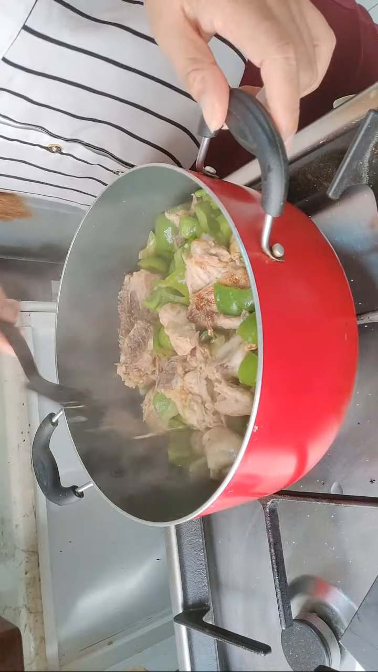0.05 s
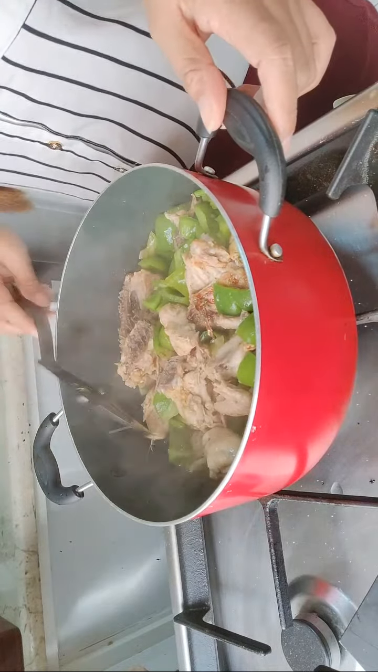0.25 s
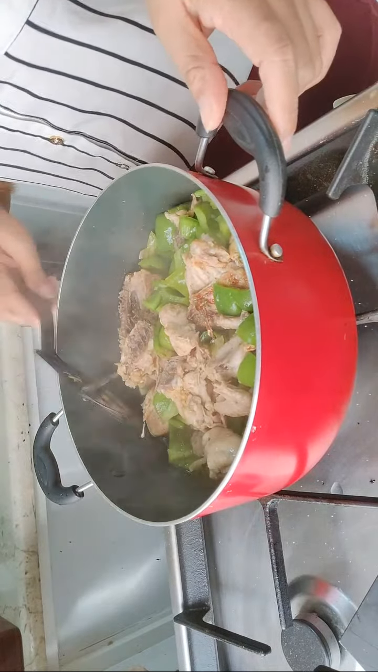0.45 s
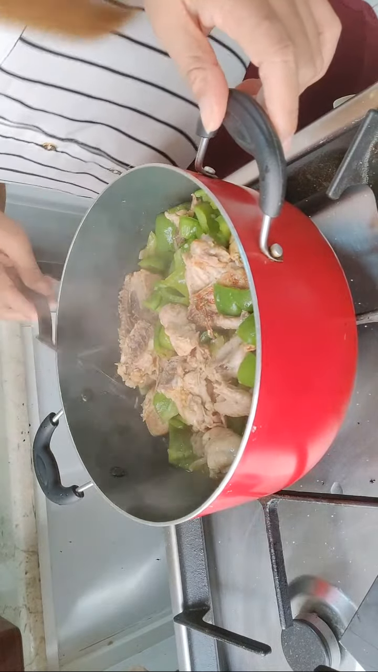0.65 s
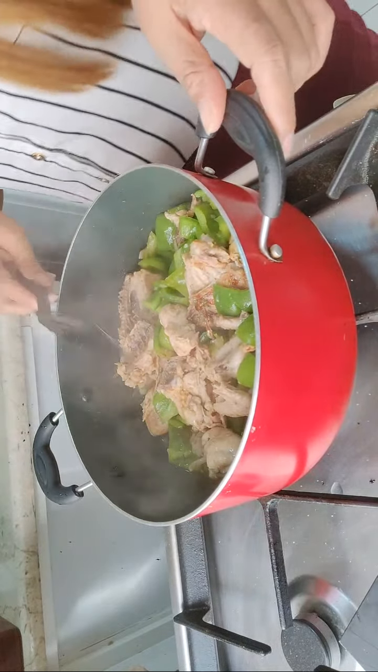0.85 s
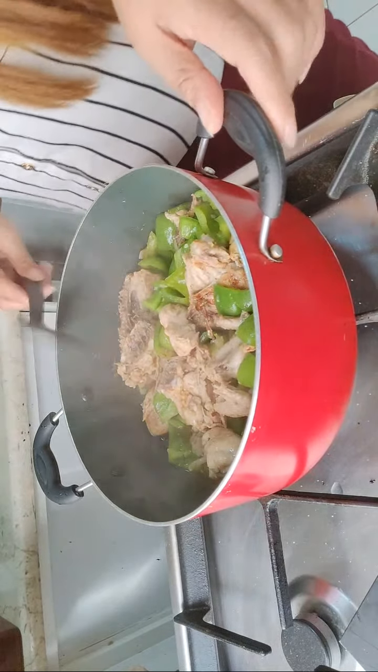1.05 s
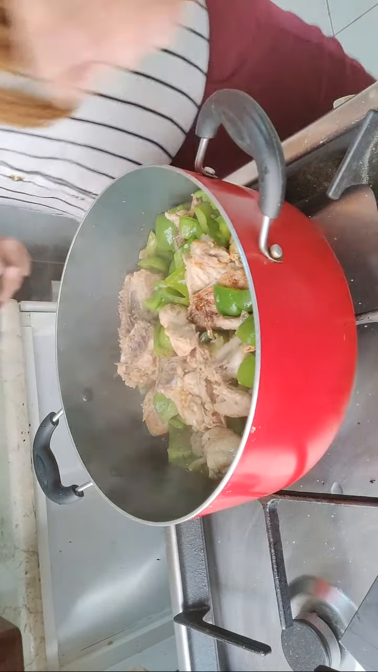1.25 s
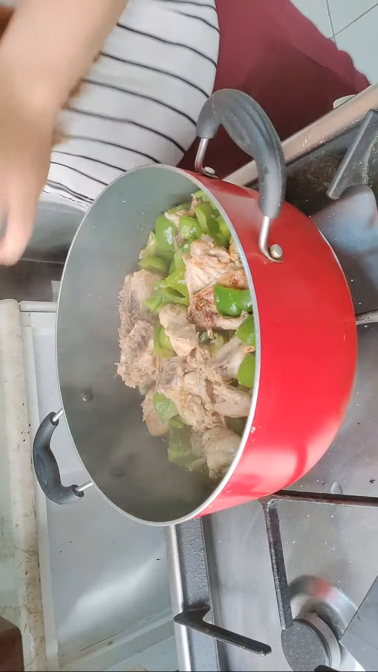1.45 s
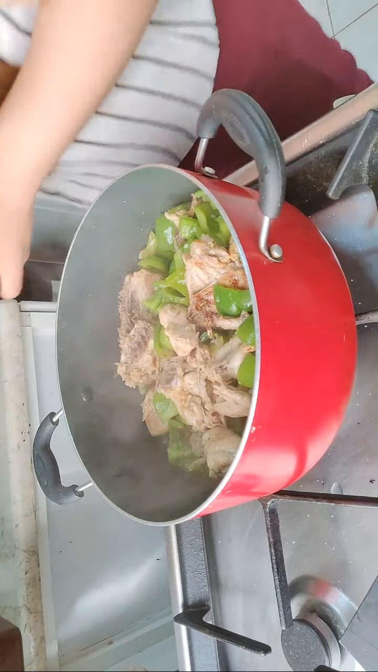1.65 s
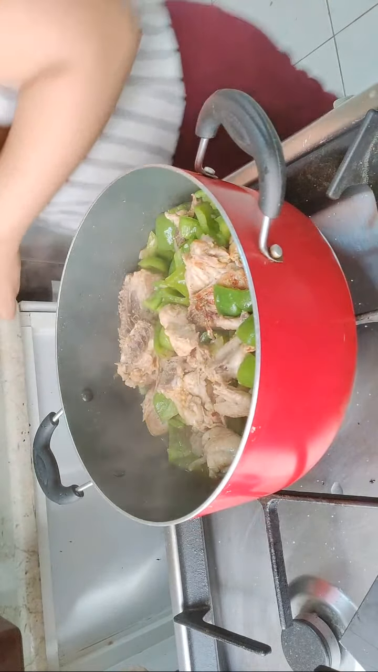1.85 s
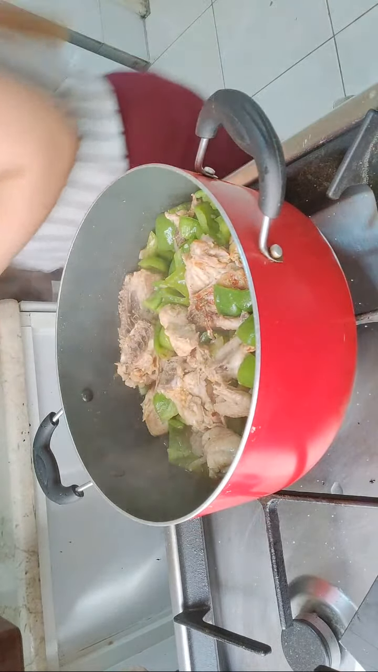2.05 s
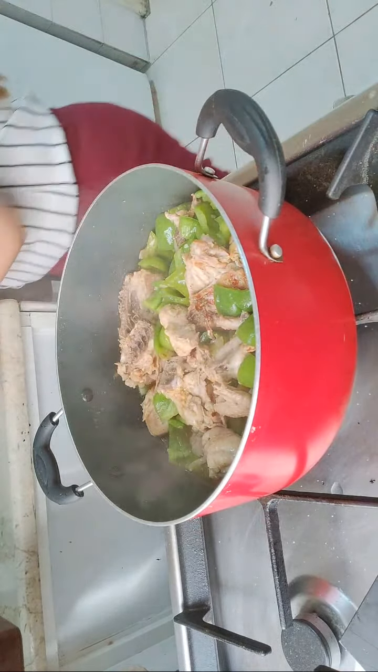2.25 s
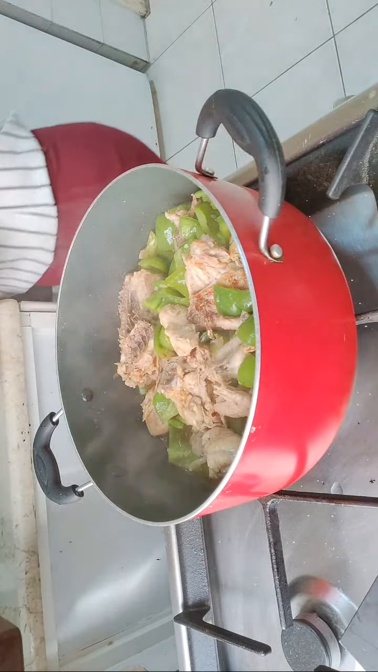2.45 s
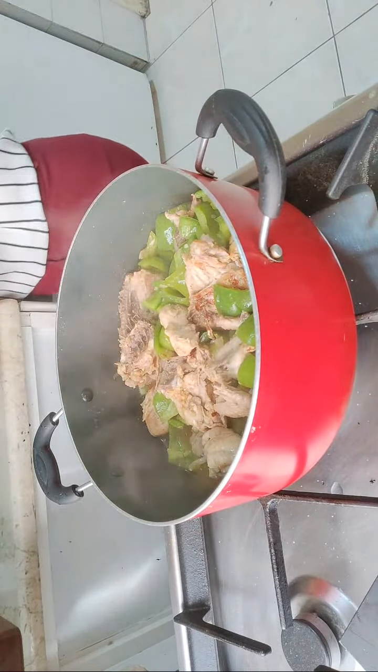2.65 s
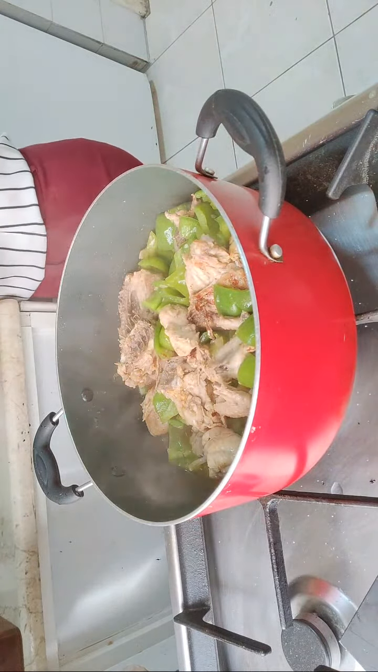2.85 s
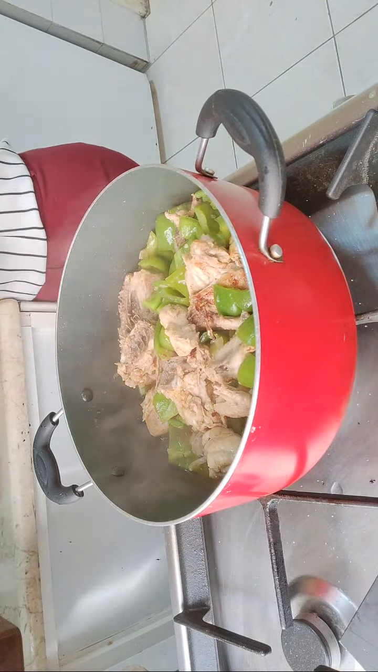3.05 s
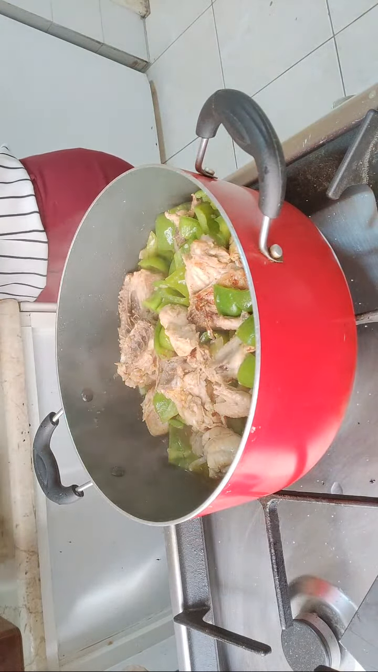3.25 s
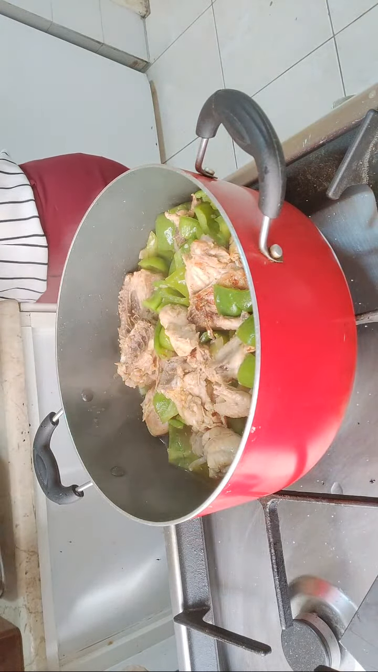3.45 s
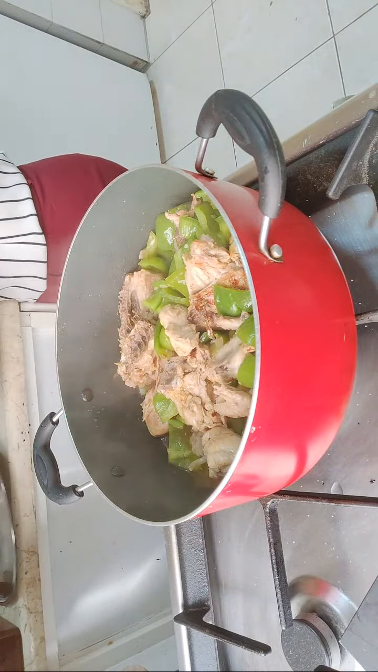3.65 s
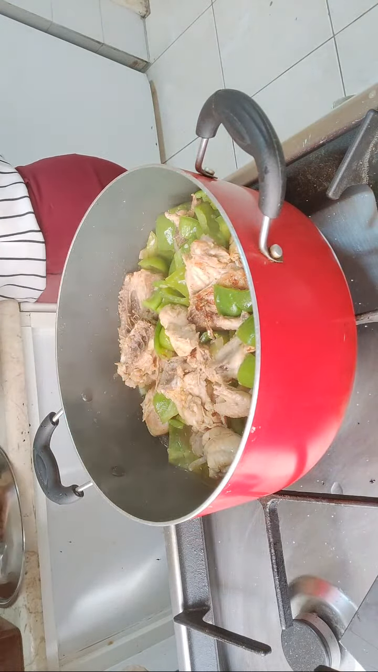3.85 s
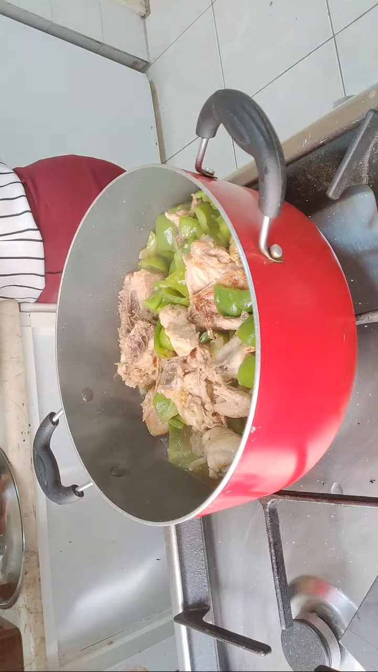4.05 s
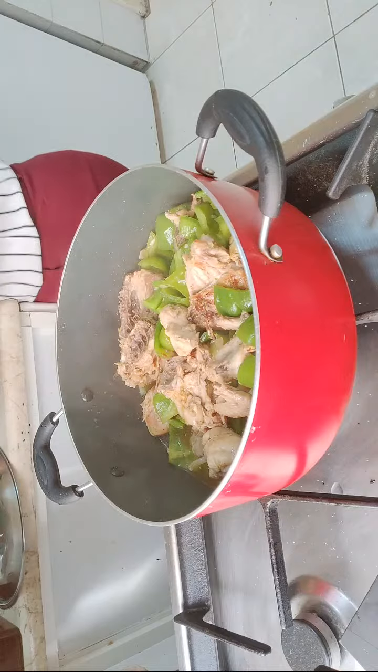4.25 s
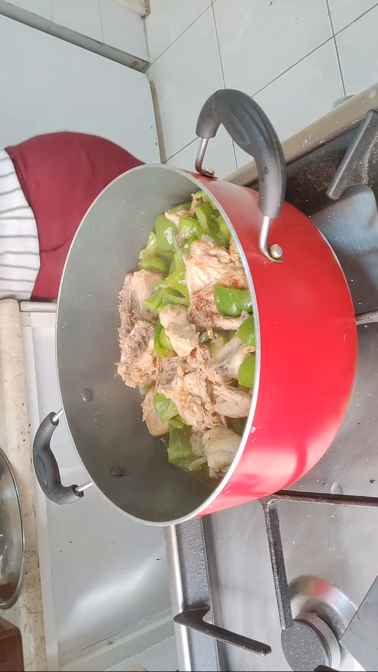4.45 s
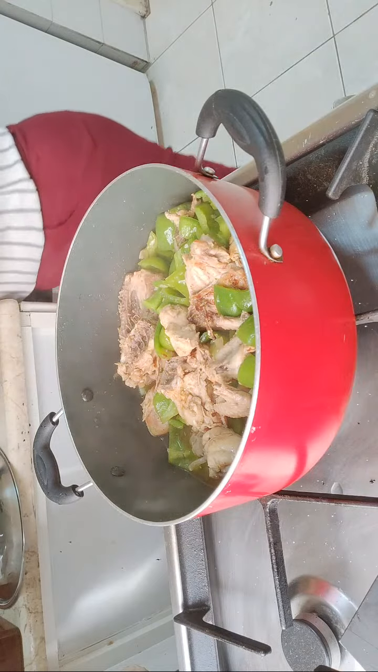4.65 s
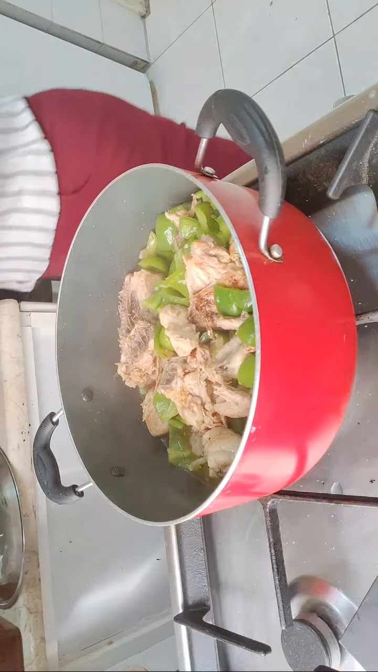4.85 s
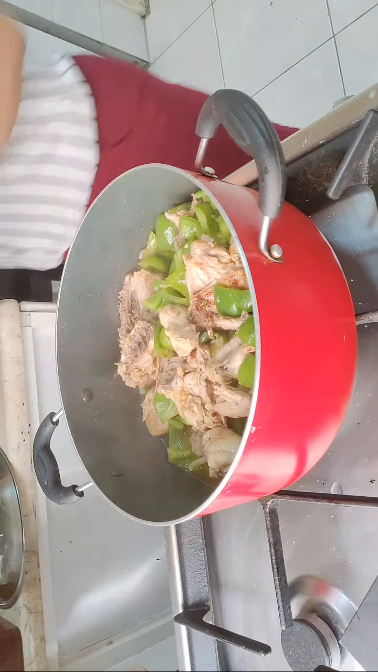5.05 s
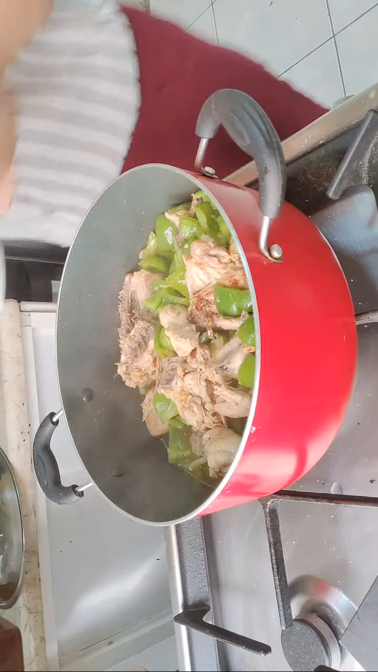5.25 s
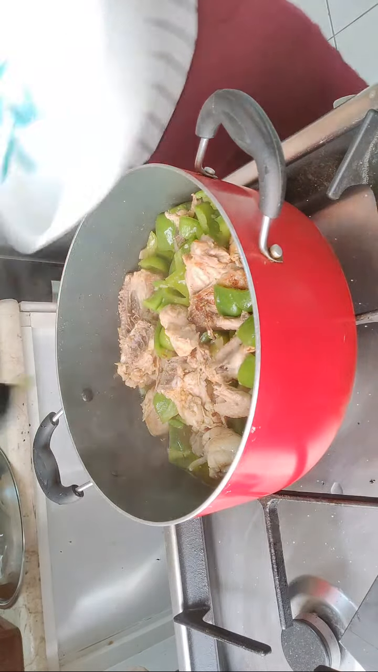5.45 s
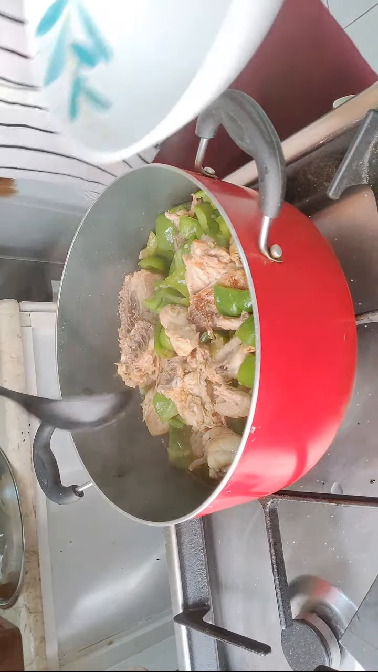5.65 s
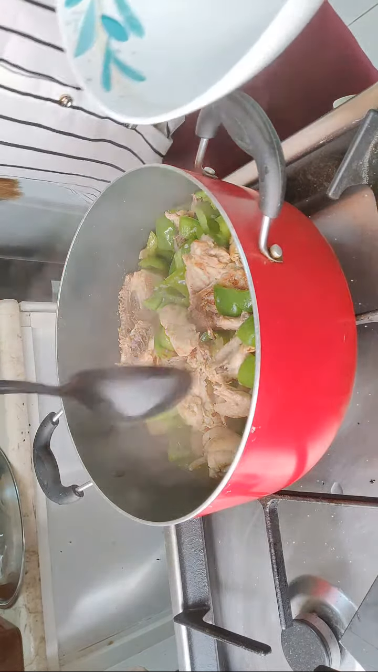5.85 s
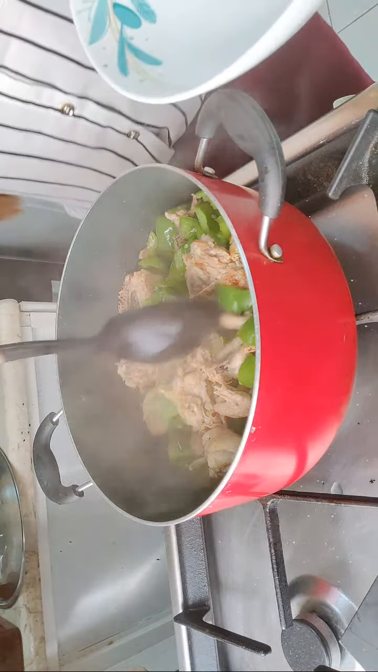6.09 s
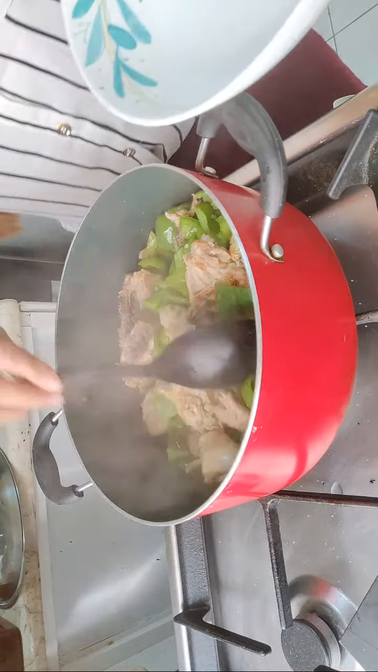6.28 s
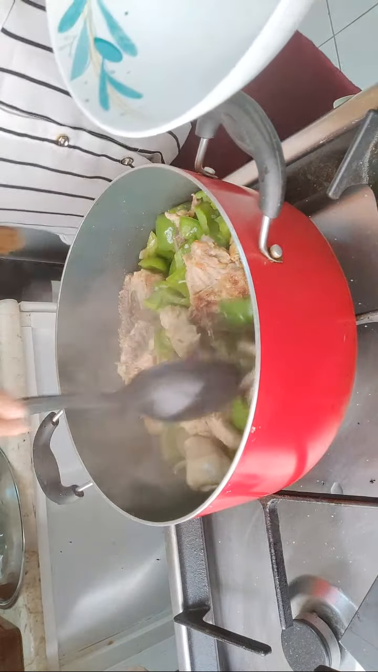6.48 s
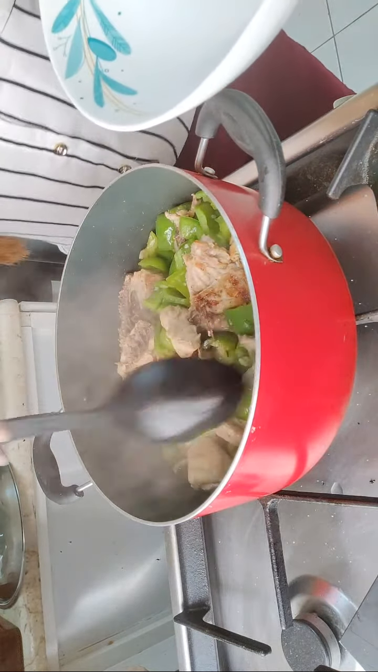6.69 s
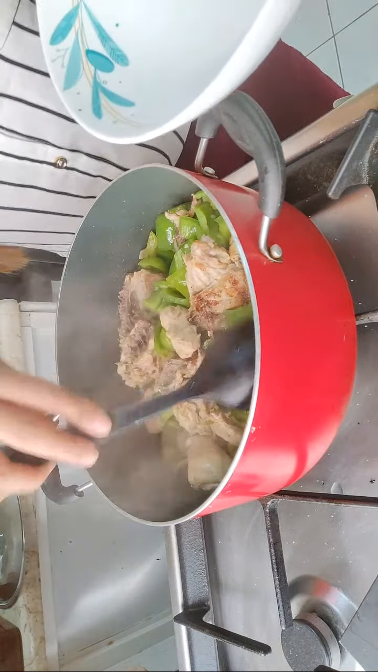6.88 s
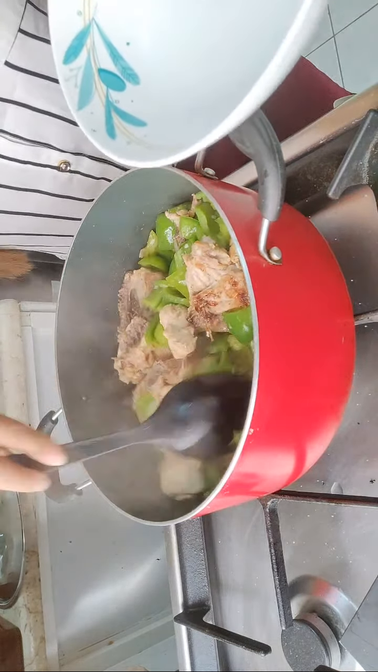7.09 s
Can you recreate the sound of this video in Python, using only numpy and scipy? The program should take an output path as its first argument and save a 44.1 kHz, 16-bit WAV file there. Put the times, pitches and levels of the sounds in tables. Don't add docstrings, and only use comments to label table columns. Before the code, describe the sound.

Five evenly spaced hard metallic cracks come from a pot rim near the microphone, with short rings and low thuds as the pot rocks on the stove. Small cutlery clinks follow at a distance, leading to a rapid, echoing steel clatter, the loudest moment. Quiet returns, then dull ladle knocks and light ticks sound on the pot. Underneath are soft spitting food, moving air and a steady low hum in a reflective kitchen.

```python
import sys
import numpy as np
from scipy import signal
from scipy.fft import rfft, irfft, next_fast_len
from scipy.io import wavfile

SR = 44100
rng = np.random.default_rng(int(sys.argv[2]) if len(sys.argv) > 2 else 0)


def materialize(psi):
    bounded = np.clip(np.atleast_2d(psi).T, -1, 1)
    quanta = np.round(bounded * 32767).astype(np.int16)
    wavfile.write(sys.argv[1], SR, quanta)


def makeup_ratio(level_db):
    decades = np.asarray(level_db, float) / 20
    return 10 ** decades


N = 314059

# f/Hz, density/dB
DRONE_COLOUR = [(15, -52), (25, -21.5), (64, -10.5), (80, -19), (118, 5), (137, -7.5), (152, -8), (254, -4),
                (404, -18), (500, -13), (650, -33.5), (1100, -120)]
AIR_COLOUR = [(210, -17), (350, 0.5), (548, -8.5), (583, -3), (841, -1), (1040, -3.5), (1200, -4),
              (4000, -13.5), (5200, -37), (8800, -120)]
SIZZLE_COLOUR = [(1760, -47), (3000, -15), (3970, -9), (4630, -4), (5670, -5), (6670, 0.5), (7050, 2.5),
                 (7670, -2.5), (8340, 2.5), (8880, -1.5), (12500, -14.5), (15100, -12.5), (16000, -24.5)]
# f/Hz, width/Hz, level/dB
STANDING_WAVES = [(89.5, 8.7, -73), (128.12, 4.67, -63), (209.3, 26, -67.5)]
# t/s, level over rest/dB
BUSTLE = [(0, -1.5), (.2, 0), (1.0, 5.5), (1.3, 8.5), (1.45, 6.5), (1.7, 0), (1.95, 0.5), (2.25, 2.5),
          (2.85, -0.5), (3.07, 3.5), (3.4, -0.5), (3.62, 0), (3.85, 10.5), (4.3, 2.5), (4.7, -0.5),
          (5.9, 0), (6.2, 0), (7.12, 2.5)]
# t/s, level/dB, length/s
FLARES = [
    (1.325, 6.5, 0.102),
    (1.64, 1.5, 0.2),
    (2.356, 3.5, 0.084),
    (2.745, 3, 0.061),
    (5.395, 2, 0.114),
    (6.327, 1.5, 0.224),
    (6.903, 1, 0.48),
]
# f/Hz, t60/s
KITCHEN_DECAY = [(150, 0.51), (500, 0.441), (1500, 0.516), (4000, 0.578), (8000, 0.444), (14000, 0.413)]

# t/s, peak level/dB, contact/ms, tines over tray/dB
CLINKS = [(2.38, -52, 5.1, 8), (2.47, -48.5, 5.5, 2.5), (2.6725, -36.5, 4.6, 21), (2.746, -32, 3.96, 12),
          (2.78, -54.5, 12, 7.5), (3.000, -32, 1.93, 1.5), (3.035, -41.5, 10, -20),
          (3.08, -48.5, 24.7, -8.5), (3.13, -47.5, 9.9, -7), (3.19, -57.5, 6, 8), (3.554, -44, 6.1, 12),
          (4.23, -44, 3.4, 8.5)]
# f/Hz, density/dB
CLINK_CRACK = [(180, -30), (300, 5.5), (856, -7), (2000, -12), (2210, -21.5), (4090, -8.5), (4750, -10.5),
               (6100, -1), (8360, -2), (16000, -27.5)]
# f/Hz, level/dB, t60/s
TRAY = [(716, -8, 0.03), (905.5, 1, 0.026), (1153, -1, 0.0164), (1393, -2.5, 0.0166)]
HANDLES = [(5690, -14, 0.017), (6007, -8.5, .02), (6850, -8, .02)]
TINES = [(8070, 1, 0.058), (9743, -6, .015)]

# t/s, peak level/dB, lip over bottom/dB
TIPPED = [
    (3.701, -32, -6.5),
    (3.705, -21, 7.5),
    (3.73, -21.5, -14),
    (3.755, -27, -14.5),
    (3.777, -23.5, 6),
    (3.80, -26.5, 4),
]
FALLEN = [
    (3.846, -18, 3.5),
    (3.849, -15, 10),
    (3.861, -9.5, 7.5),
    (3.872, -7.5, -0.5),
    (3.882, -10, 5.5),
    (3.899, -13.5, -12),
    (3.915, -10.5, -7),
    (3.94, -24, 11.5),
    (3.955, -29.5, 7.5),
    (3.99, -18, 7.5),
]
# f/Hz, density/dB
CLATTER_CRACK = [(300, -20), (450, -12.5), (560, -3.5), (850, -12.5), (1250, -10), (2000, -9.5), (3200, -5),
                 (4100, -12.5), (5500, -9), (6400, -8), (8200, -1), (10000, -9.5), (12500, -17),
                 (16400, -18)]
# f/Hz, level/dB, t60/s
BOWL_BOTTOM = [(555, -17.5, 0.029), (1210, -5, 0.03), (1416, -3.5, 0.12), (1757, -4, 0.113),
               (1941.6, -3, 0.033)]
BOWL_SIDE = [(2166, -3.5, 0.056), (2603, -5.5, 0.067), (2660, -2, 0.019), (2896, -8, 0.031),
             (3260, -1.5, 0.144), (3640, -17, 0.045), (5533, -0.5, 0.046)]
BOWL_LIP = [(6755, -6.5, .06), (6826, -3, 0.033), (6978, -5.5, 0.038), (7310, 1.5, 0.058),
            (7460, 3.5, 0.081), (7650, -5, .04), (7900, -6.5, 0.054), (8680, -18, 0.083),
            (8105, 2.5, 0.076), (8350, 2.5, 0.051), (8250, -7.5, 0.058), (9170, -17.5, 0.112),
            (9344, 0, 0.077), (10120, -2, .07), (9646, -6.5, 0.105), (10210, -18, 0.059),
            (11250, -14.5, .05)]

# t/s, peak level/dB, contact/ms, ring/dB
TICKS = [
    (2.085, -52, 60, -28.5),
    (2.13, -65.5, 33, -22),
    (6.236, -51, 5.4, -15.5),
    (6.449, -37.5, 5.7, -18.5),
    (6.47, -54.5, 43, -5.5),
    (6.793, -41.5, 3.4, 3),
    (6.805, -51.5, 40, -15),
]
# f/Hz, density/dB
TICK_CRACK = [(300, -10), (1000, 1), (2000, -1), (4000, 0.5), (8000, 3), (16000, -21)]
# f/Hz, level/dB, t60/s
EDGE_LOW = [(2471, -4, 0.0062), (3030, -9.5, 0.0097)]
EDGE_HIGH = [(4020, 3, 0.0082), (4400, -5, .01), (5277, -4, 0.011)]
# t/s, peak level/dB, contact/ms, sway over wall/dB
BUMPS = [
    (2.284, -43.5, 19.5, -11),
    (6.189, -52.5, 5.1, -1),
    (6.341, -37, 2.23, -11),
    (6.35, -49, 3.5, -3),
    (6.379, -45, 11, -4.5),
    (6.45, -28, 6.3, -1.5),
    (6.48, -31.5, 14, 9.5),
]

# f/Hz, density/dB
POT_THUD = [(59, -44), (100, 5), (165, -2), (253, 7), (458, -9.5), (744, 1), (1440, -16.5), (1880, -47.5),
            (2500, -34), (3250, -59), (5500, -120)]
# f/Hz, level/dB, t60/s
POT_SWAY = [(214.9, 0, 0.1536)]
POT_BASE = [(281, -4.5, 0.0766), (342.65, -0.5, 0.0327), (454.6, -9, 0.0514)]
POT_WALL = [(559.3, -6.5, 0.29), (716, -3.5, 0.037), (763.6, -7, 0.055), (1003, -12.5, 0.047)]
# t/s, peak level/dB
LATE_ROCKS = [
    (0.714, -36),
    (1.141, -34.5),
]

# t/s, peak level/dB, contact/ms, rebound after/ms, rebound loss/dB
RAPS = [
    (0.2405, -19.5, 3.94, 21.5, 8.5),
    (0.469, -17, 2.99, 18, 20),
    (.677, -17.5, 2.98, 26.25, 11.5),
    (0.8678, -9.5, 2.33, 19.6, 18),
    (1.0899, -10, 3.69, 18.2, 12.5),
]
# f/Hz, density/dB
RAP_CRACK = [(120, -50), (200, -4.5), (1500, -5.5), (2510, -9), (2860, -12), (3900, -5.5), (5420, -11.5),
             (6520, -7), (7010, -2.5), (8270, -7), (8900, -8), (10500, -20), (16000, -36)]
# f/Hz, level/dB, t60/s
RIM = [(860.5, -20, 0.443), (1146, -10.5, 0.1143), (1262, -3, 0.0034), (1677, -3.5, 0.0051),
       (2330, -18, 0.0031)]
BLADE_LOW = [(3734, -10, 0.118), (3838, 3, 0.018), (3978.5, -2, 0.0426), (4110, -3, 0.034),
             (4300, 1.5, 0.0078), (4606, -14, 0.005)]
BLADE_HIGH = [(6540, 1, 0.0187), (6555, 4.5, 0.0054), (7012, -5, 0.0067), (8060, -9.5, 0.064),
              (9620, -18.5, 0.0063)]


def rms_one(x):
    return x / np.sqrt(np.mean(x ** 2) + 1e-20)


def at_hz(points, hz):
    table_hz, values = np.transpose(points)
    return np.interp(np.log(hz), np.log(table_hz), values)


def coloured(spectrum, white):
    size = next_fast_len(N)
    hz = np.maximum(np.arange(size // 2 + 1) * SR / size, 1)
    octaves_below = np.maximum(np.log2(spectrum[0][0] / hz), 0)
    octaves_above = np.maximum(np.log2(hz / spectrum[-1][0]), 0)
    gain = makeup_ratio(at_hz(spectrum, hz) - 30 * (octaves_below + octaves_above))
    return rms_one(irfft(rfft(white, size) * gain, size)[:N])


def ring(force, hz, t60):
    r, w = makeup_ratio(-60 / (t60 * SR)), 2 * np.pi * hz / SR
    return signal.lfilter([0, np.sin(w)], [1, -2 * r * np.cos(w), r * r], force + 1e-18)


def contacts(times, levels_db, lengths, rise):
    out = np.zeros(N)
    for s, db, length in zip(times, levels_db, lengths):
        i = int(s * SR)
        t = np.arange(min(int(7 * length * SR), N - i)) / SR
        out[i:i + len(t)] += makeup_ratio(db) * (1 - np.exp(-t / (rise * length))) * np.exp(-t / length)
    return out


def struck(events, crack, bodies, crack_db, modes_db, rise, rough, snap):
    s, peak_db, length, *shares_db = np.transpose(events)
    length = np.clip(length / 1000, .0005, .08)
    crack_noise = coloured(crack, rng.standard_normal(N))
    out = makeup_ratio(crack_db) * contacts(s, peak_db, snap * length, rise) * crack_noise
    span = np.arange(int(s[0] * SR), min(N, int((s[-1] + .6) * SR)))
    for body, share_db in zip(bodies, shares_db):
        force_db = peak_db + share_db + modes_db - 20 * np.log10(length * SR / 2)
        force = contacts(s, force_db, length, rise)[span]
        for hz, db, t60 in body:
            wander = np.cumsum(rng.standard_normal(len(span))) * np.sqrt(rough * hz / SR)
            drive = force * np.cos(2 * np.pi * hz * span / SR + wander)
            loss = 1 + np.log(1000) * np.median(length) / t60
            out[span] += makeup_ratio(db) * loss * ring(drive, hz, t60)
    return out


def leaning(rows, share_db):
    first, middle, last = share_db
    return [(s, db, ms, first - lean / 2, middle, last + lean / 2) for s, db, ms, lean in rows]


def hum():
    out = 0
    for hz, width, db in STANDING_WAVES:
        wave = ring(rng.standard_normal(N + SR), hz, 1.99 / width)[SR:]
        out = out + makeup_ratio(db) * rms_one(wave)
    return out


def drift(rate_hz):
    r = np.exp(-2 * np.pi * rate_hz / SR)
    return rms_one(signal.lfilter([1], [1, -2 * r, r * r], rng.standard_normal(N + SR))[SR:])


def sizzle(bustle_db):
    t = np.arange(N) / SR
    flare_db = sum(db * np.exp(-((t - s) / length) ** 2) for s, db, length in FLARES)
    spit_on = rng.random(N) < 400 / SR
    spit_size = makeup_ratio(7.0 * np.minimum(rng.exponential(1, N), 4))
    spits = spit_on * spit_size * rng.choice([-1, 1], N)
    fizz = rng.standard_normal(N) + 0.426 * rms_one(spits)
    level_db = -60.5 + 0.251 * bustle_db + flare_db + 0.8243 * drift(4.3)
    return makeup_ratio(level_db) * coloured(SIZZLE_COLOUR, fizz)


def background():
    bustle_db = np.interp(np.arange(N) / SR, *np.transpose(BUSTLE))
    drone = makeup_ratio(-59.5 + 0.913 * bustle_db) * coloured(DRONE_COLOUR, rng.standard_normal(N))
    air = makeup_ratio(-63.5 + 0.758 * bustle_db) * coloured(AIR_COLOUR, rng.standard_normal(N))
    return drone + air + sizzle(bustle_db) + hum()


def kitchen(x, first_wall):
    t, tail = np.arange(SR) / SR, 0
    edges = 60 * 2 ** np.arange(0, 8.1, .5)
    for low, high in zip(edges, edges[1:]):
        sos = signal.butter(2, [low, high], "band", fs=SR, output="sos")
        band = signal.sosfilt(sos, rng.standard_normal(SR))
        tail = tail + band * makeup_ratio(-60 * t / at_hz(KITCHEN_DECAY, np.sqrt(low * high)))
    tail = tail * (1 - np.exp(-(t / first_wall) ** 2))
    return signal.fftconvolve(x, tail / np.sqrt(np.sum(tail ** 2)))[:N]


def cutlery_clinks():
    return struck(leaning(CLINKS, (-10, 3, -8.5)), CLINK_CRACK, [TRAY, HANDLES, TINES],
                  crack_db=-6.5, modes_db=-9.0, rise=0.041, rough=0.4385, snap=0.65)


def ladle_ticks():
    return struck([(*row, row[-1]) for row in TICKS], TICK_CRACK, [EDGE_LOW, EDGE_HIGH],
                  crack_db=1.0, modes_db=-16.5, rise=0.259, rough=0.8, snap=1.294)


def ladle_bumps():
    damped_t60_s = 0.059
    damped_wall = []
    for hz, db, t60 in POT_WALL:
        loss_db = 0.25 * 20 * np.log10(min(damped_t60_s / t60, 1))
        damped_wall.append((hz, db + loss_db, min(t60, damped_t60_s)))
    rows = leaning([(s, db, ms, -lean) for s, db, ms, lean in BUMPS], (-1, 1, -3))
    return struck(rows, POT_THUD, [POT_SWAY, POT_BASE, damped_wall],
                  crack_db=-8, modes_db=-8, rise=0.091, rough=0.2, snap=1.05)


def chatter(touches, share_db):
    touch_ms, settled_ms, settling_s = 4.1, 13.86, 0.0108
    first, rows = touches[0][0], []
    for s, db, lean in touches:
        ms = settled_ms + (touch_ms - settled_ms) * np.exp((first - s) / settling_s)
        rows.append((s, db, ms, lean))
    return leaning(rows, share_db)


def bowl_clatter():
    rows = chatter(TIPPED, (-0.5, 5, 1.5)) + chatter(FALLEN, (-5.5, -1.6, 1.5))
    return struck(rows, CLATTER_CRACK, [BOWL_BOTTOM, BOWL_SIDE, BOWL_LIP],
                  crack_db=-12, modes_db=-17.5, rise=0.24, rough=0.439, snap=1.03)


def pot_jolts():
    jolt_lag_ms, jolt_db, jolt_ms = 1.89, -35, 5.67
    rock_db, rock_follows, rock_ms = -28, 0.457, 18.24
    jolt_share_db, rock_share_db = (-8, -0.5, 0), (-3, -2.5, -11)
    mean_rebound_db = np.mean([row[1] - row[4] for row in RAPS])
    rows = []
    for s, db, _, after, loss in RAPS:
        swing_db = rock_follows * (db - loss - mean_rebound_db)
        rows.append((s + jolt_lag_ms / 1000, jolt_db, jolt_ms, *jolt_share_db))
        rows.append((s + after / 1000, rock_db + swing_db, rock_ms, *rock_share_db))
    rows += [(s, db, rock_ms, *rock_share_db) for s, db in LATE_ROCKS]
    return struck(rows, POT_THUD, [POT_SWAY, POT_BASE, POT_WALL],
                  crack_db=-5.5, modes_db=-6.5, rise=0.222, rough=0.2, snap=0.95)


def rap_contacts():
    graze_ms, graze_loss_db, graze_contact_ms = 4.2, 23.5, 3.2
    rebound_contact_ms = 3.55
    blow_db, graze_db, rebound_db = (-5, 0.5, 4), (-17, -13, 6.5), (3.5, 1, -9)
    blade_softens = 0.33
    rim_wakes = 1.89
    _, mean_db, _, _, mean_loss = np.mean(RAPS, axis=0)
    rows = []
    for s, db, ms, after, loss in RAPS:
        upper_db = blow_db[2] - blade_softens * (db - mean_db)
        rim_db = rebound_db[0] + rim_wakes * (db - loss - mean_db + mean_loss)
        rows.append((s - graze_ms / 1000, db - graze_loss_db, graze_contact_ms, *graze_db))
        rows.append((s, db, ms, *blow_db[:2], upper_db))
        rows.append((s + after / 1000, db - loss, rebound_contact_ms, rim_db, *rebound_db[1:]))
    return rows


def spatula_raps():
    return struck(rap_contacts(), RAP_CRACK, [RIM, BLADE_LOW, BLADE_HIGH],
                  crack_db=-2.5, modes_db=-13.5, rise=0.323, rough=0.15, snap=0.957)


def scene():
    raps, jolts, bumps = spatula_raps(), pot_jolts(), ladle_bumps()
    ticks, clinks, bowl = ladle_ticks(), cutlery_clinks(), bowl_clatter()
    sent = makeup_ratio(-7.0) * raps + makeup_ratio(-5.5) * (jolts + bumps) + makeup_ratio(-8.0) * ticks
    sent = sent + makeup_ratio(1.5) * clinks + makeup_ratio(-3.0) * bowl
    direct = raps + jolts + bumps + ticks + clinks + bowl
    return (direct + kitchen(sent, first_wall=0.00149) + background())[None]


def band_limit(x):
    return signal.sosfilt(signal.butter(12, 16460, fs=SR, output="sos"), x)


def record(dry):
    x = signal.sosfilt(signal.butter(3, 46.3, "high", fs=SR, output="sos"), dry)
    x = signal.sosfilt(signal.cheby2(14, 60, 16600, fs=SR, output="sos"), x)
    return band_limit(x)


dry = scene()
out = record(dry)
materialize(out)
```